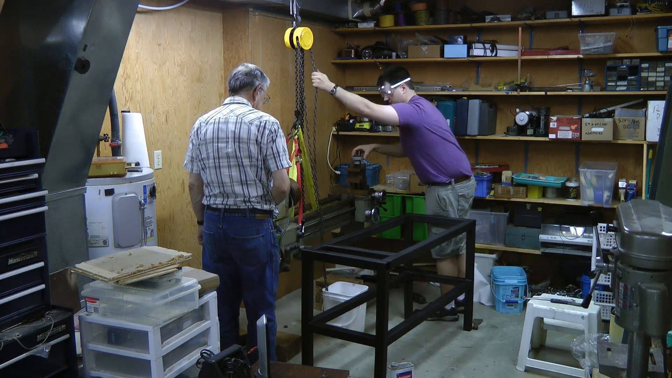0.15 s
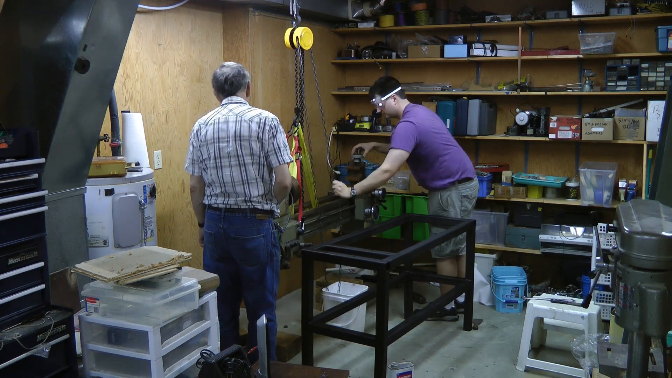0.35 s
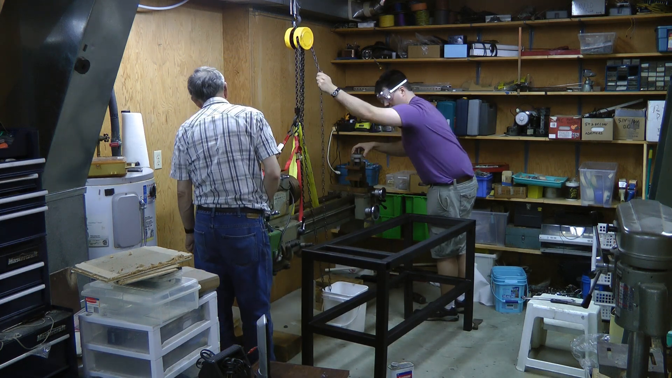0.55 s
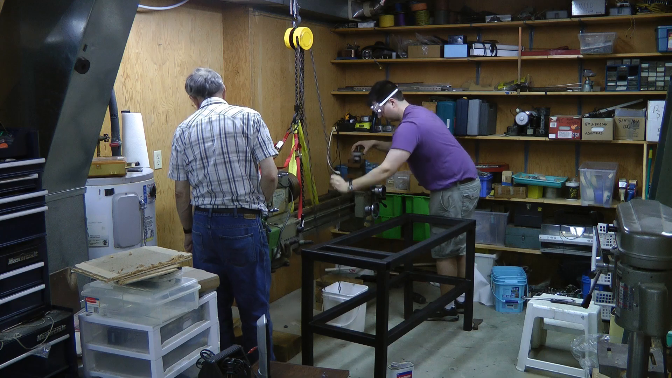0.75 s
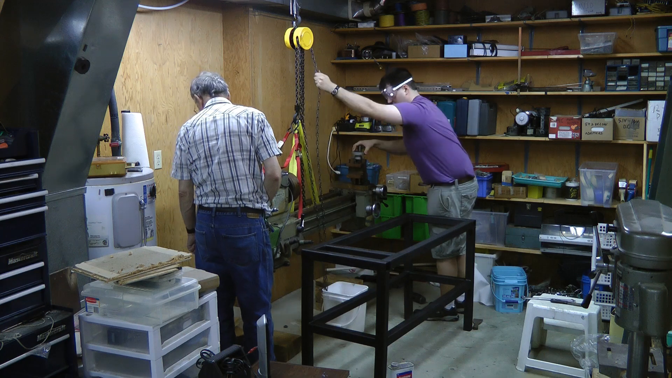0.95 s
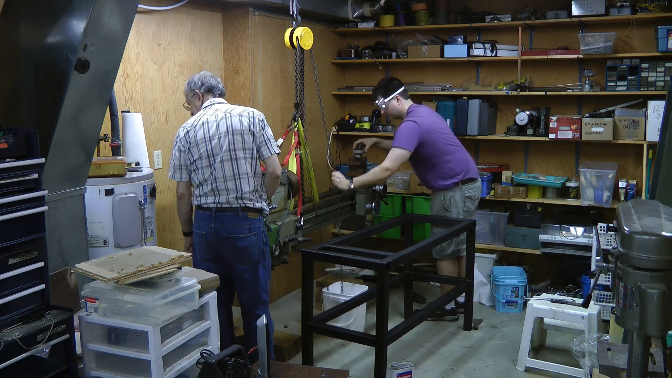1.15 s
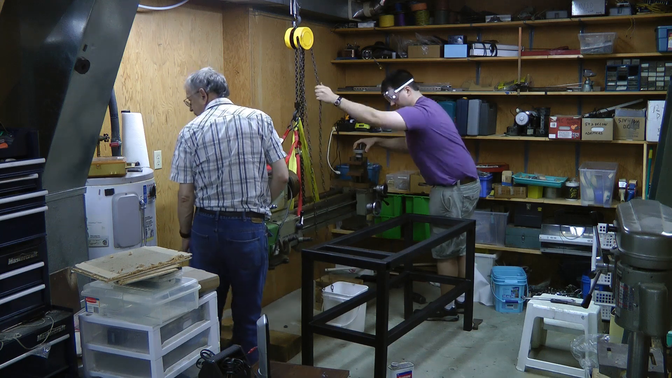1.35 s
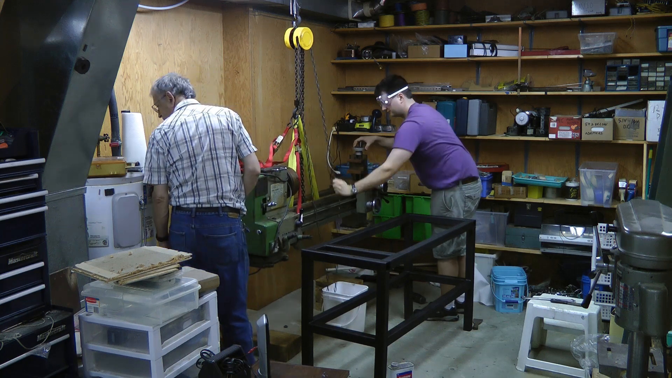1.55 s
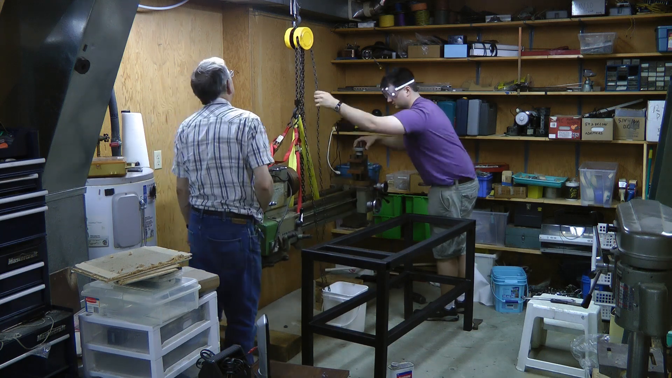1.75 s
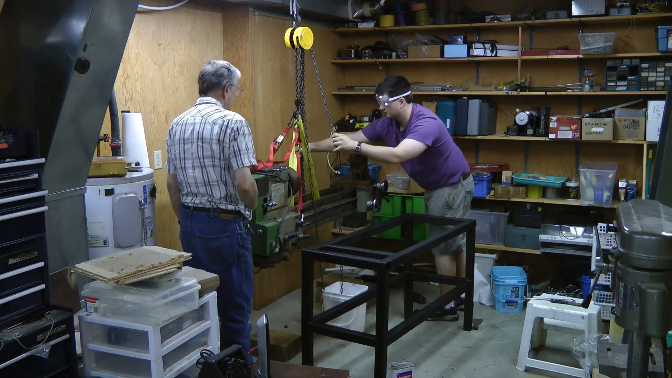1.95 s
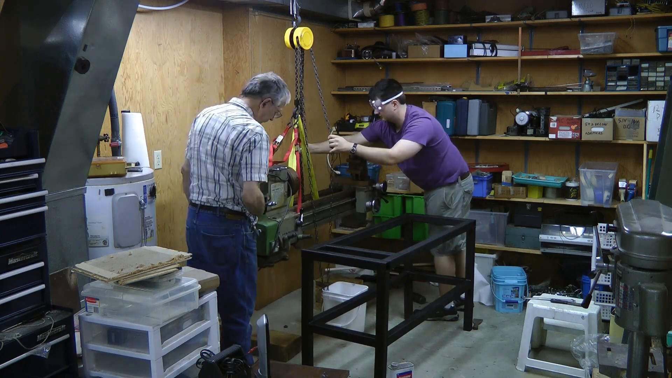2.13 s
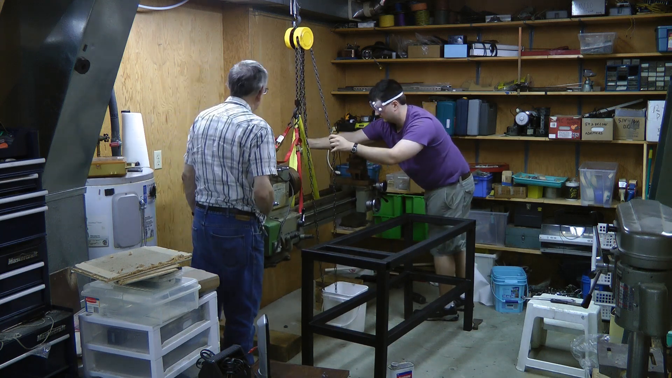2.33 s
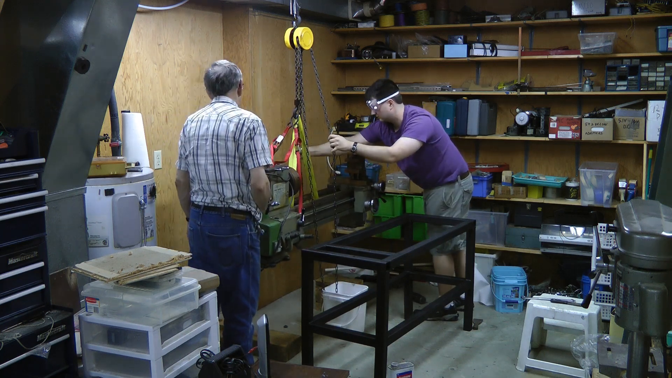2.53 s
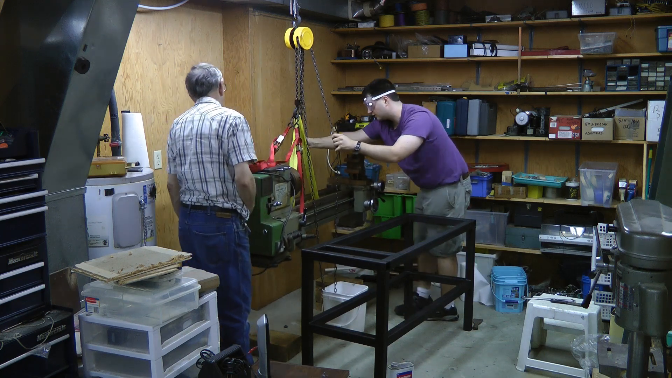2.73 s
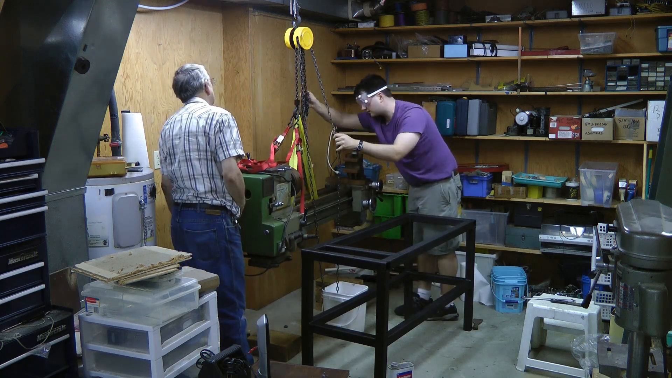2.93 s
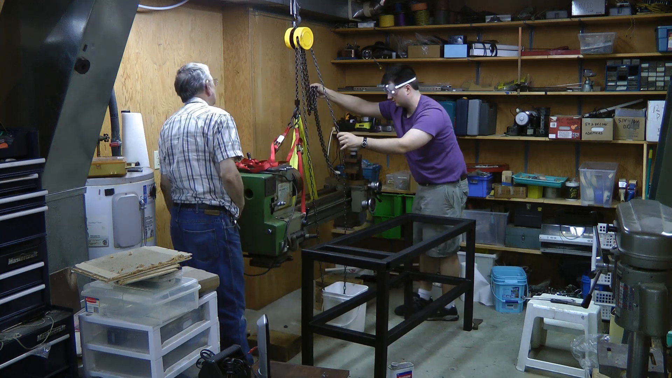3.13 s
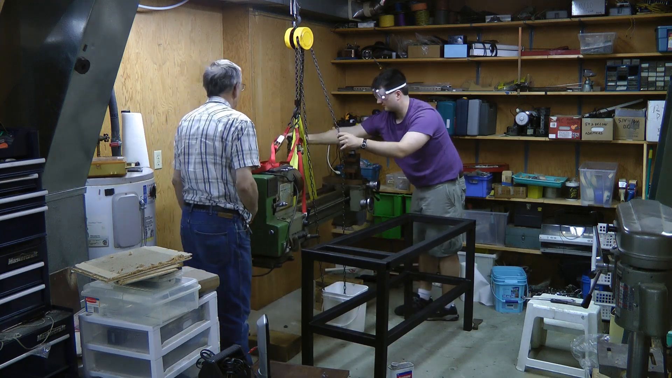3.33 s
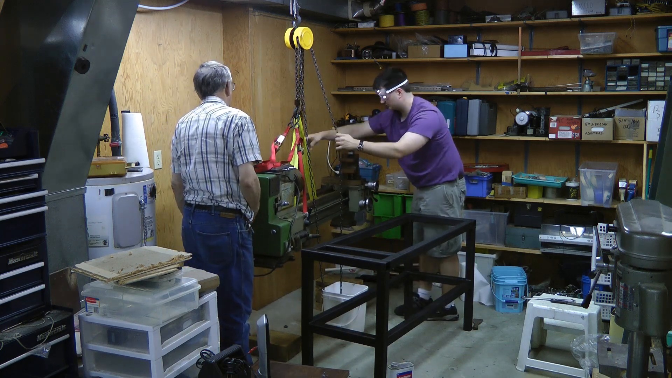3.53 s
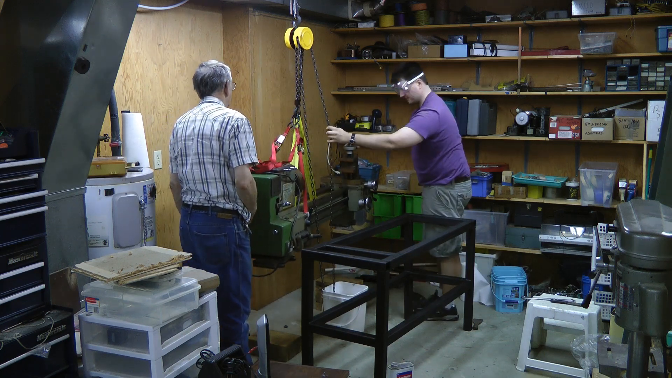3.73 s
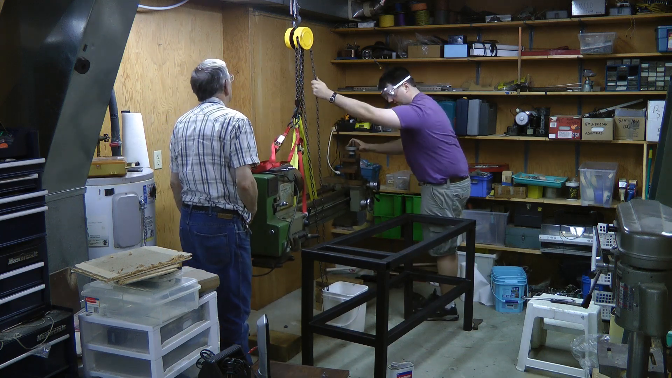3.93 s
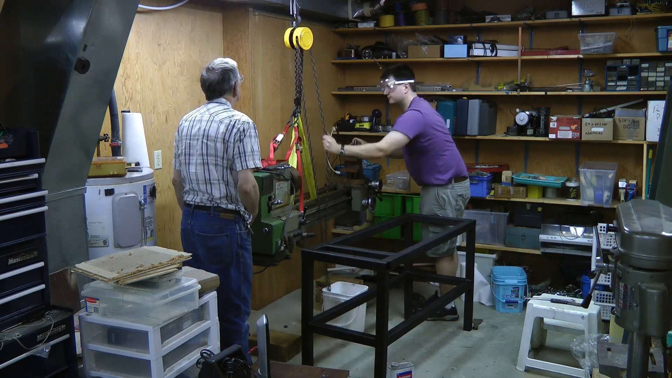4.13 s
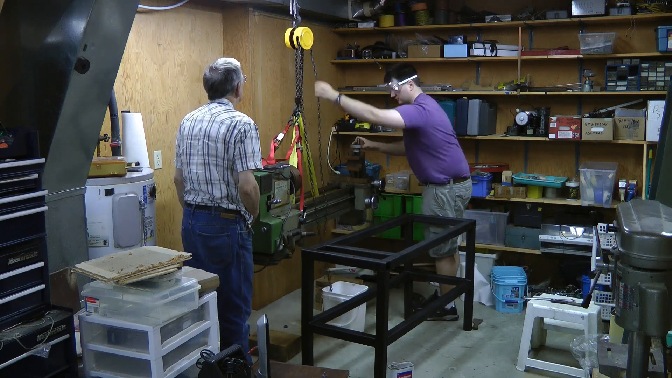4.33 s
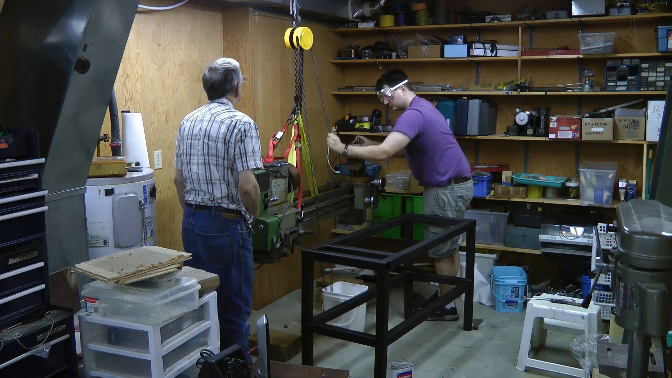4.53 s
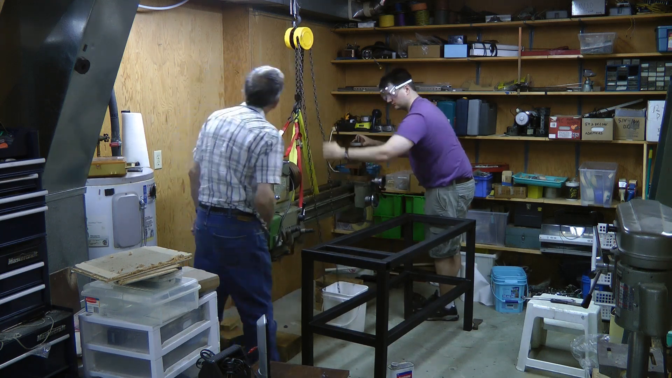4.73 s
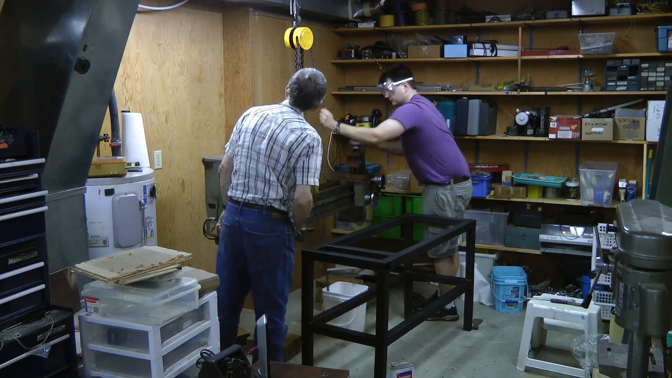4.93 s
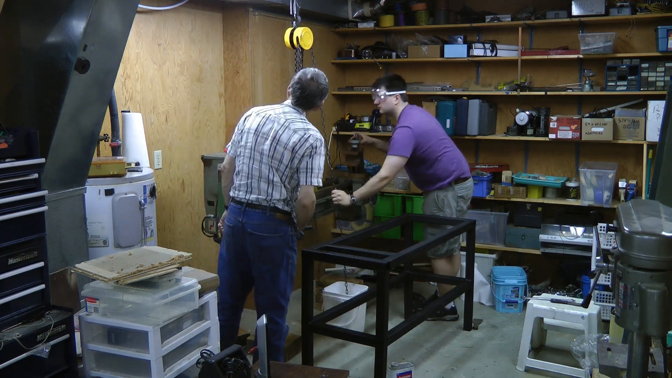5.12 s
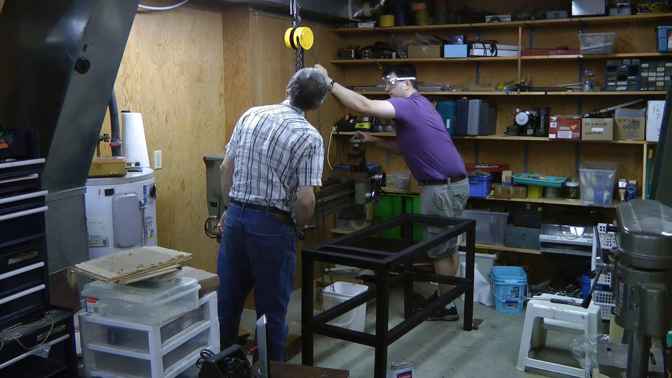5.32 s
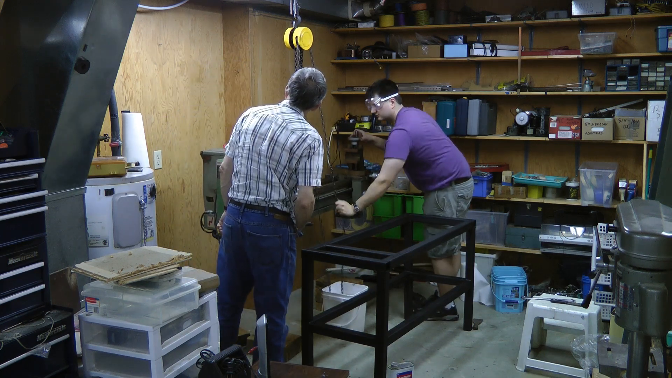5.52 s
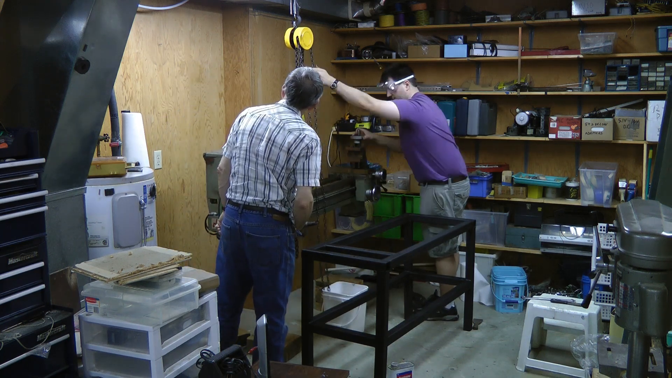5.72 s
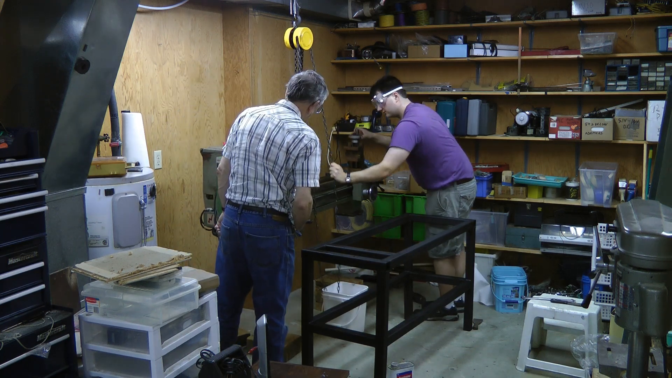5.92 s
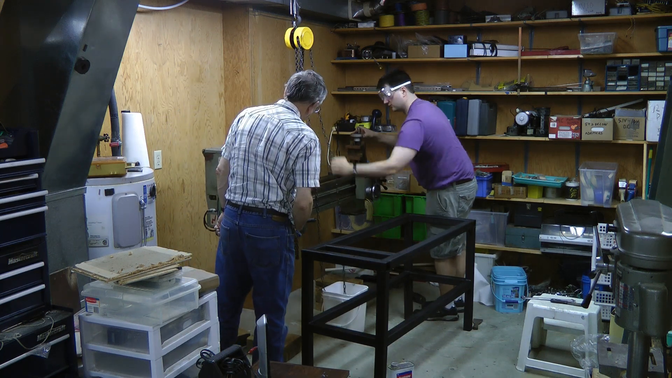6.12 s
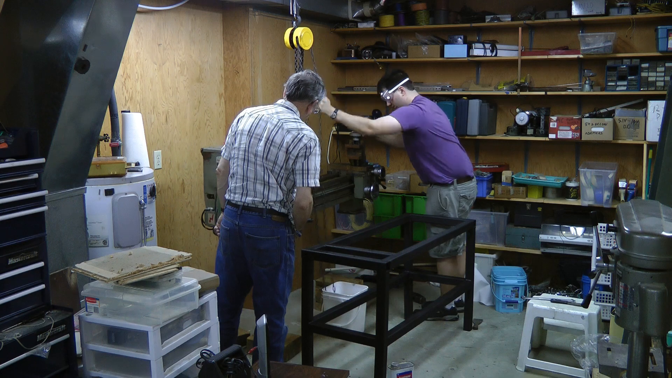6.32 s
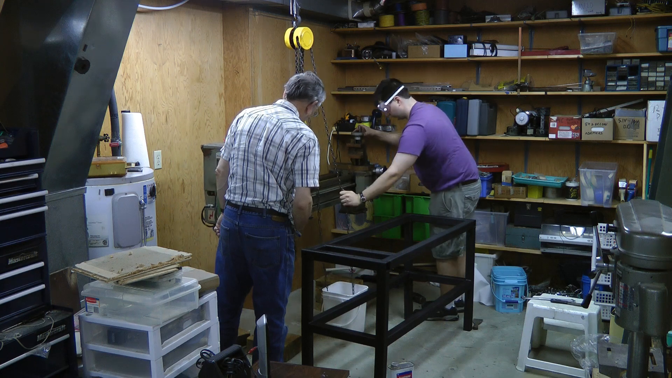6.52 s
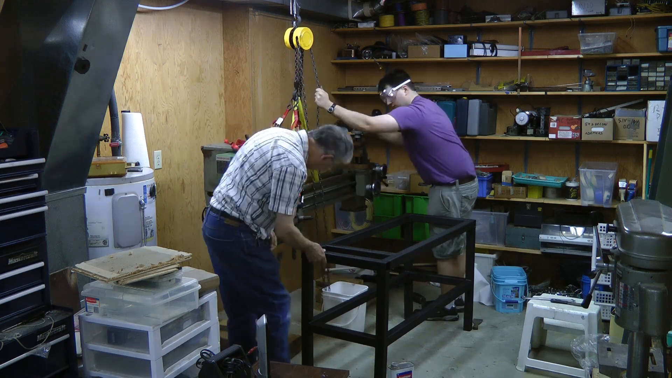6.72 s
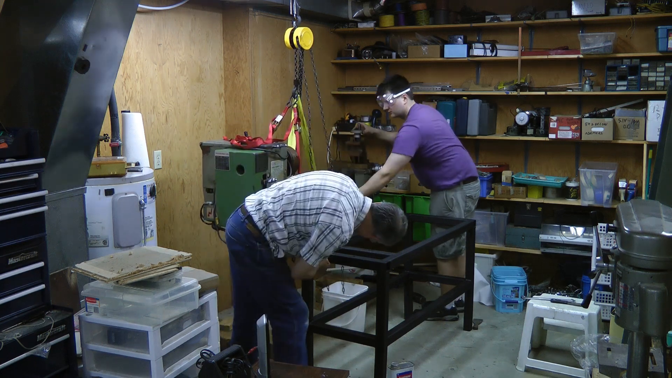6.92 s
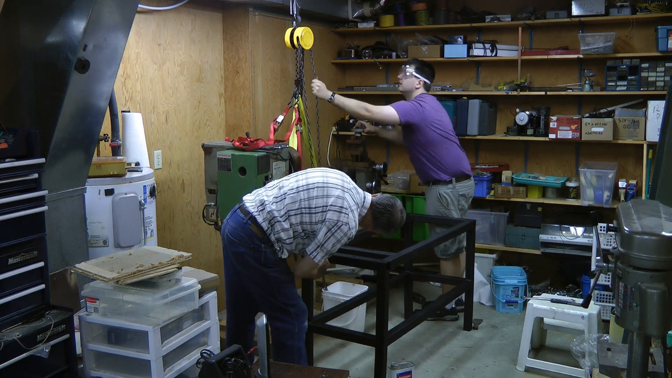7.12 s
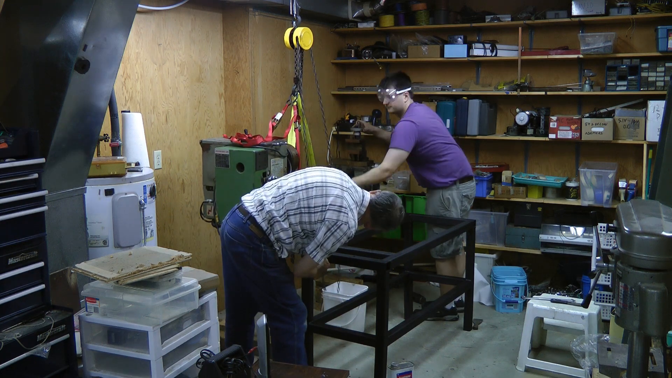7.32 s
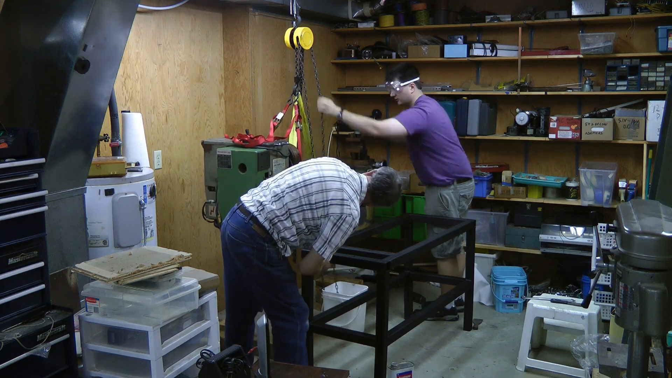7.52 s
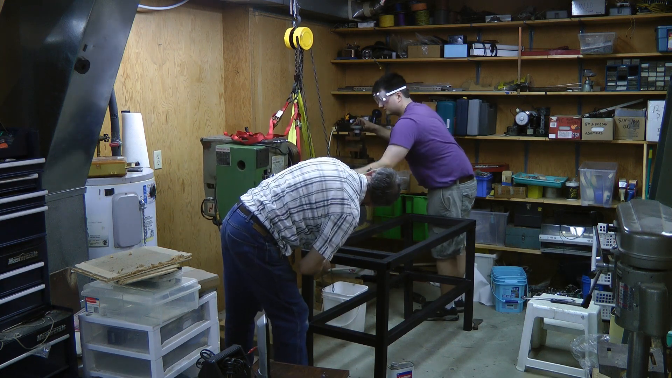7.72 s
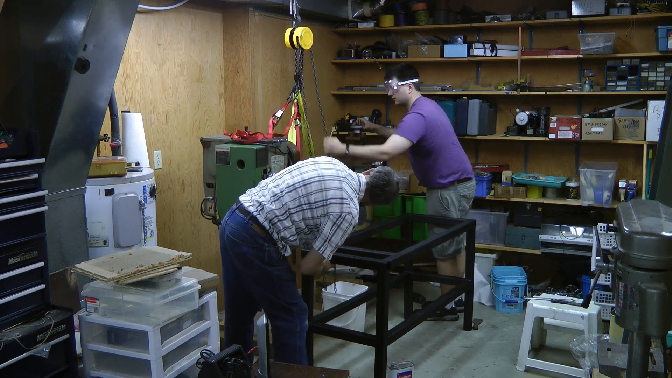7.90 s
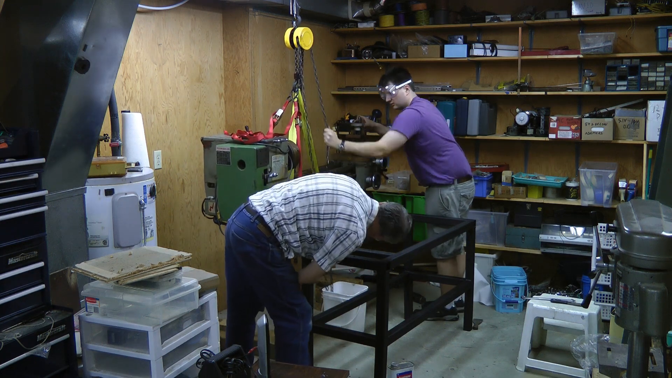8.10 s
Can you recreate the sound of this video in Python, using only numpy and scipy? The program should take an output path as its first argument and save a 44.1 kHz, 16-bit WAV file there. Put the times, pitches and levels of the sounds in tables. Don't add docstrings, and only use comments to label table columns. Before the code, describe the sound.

Rapid regular ratchety chain hauls ring a steel housing in a small workshop, pause for faint knocks on a machine, then resume steadily.

```python
import sys
import numpy as np
from scipy import signal
from scipy.fft import rfft, irfft, next_fast_len
from scipy.io import wavfile
from scipy.ndimage import uniform_filter1d

SR = 44100
rng = np.random.default_rng(int(sys.argv[2]) if len(sys.argv) > 2 else 0)


def generate_wav(sig):
    pcm = np.round(np.clip(np.atleast_2d(sig).T, -1, 1) * 32767).astype(np.int16)
    wavfile.write(sys.argv[1], SR, pcm)


def attenuation_scalar(level_db):
    decades = np.asarray(level_db, float) / 20
    return 10 ** decades


N = 359856
T = np.arange(N) / SR

PIECE = 1024
STEADY = 0.6
VARY_DB = 4.5

# (start [s], end [s], effort [dB], time to build the pull [s], sway left in the slack chain [dB])
HAULS = [(-.1, 0.01, -27, .02, -39), (0.225, 0.399, -30.5, 0.008, -59), (0.621, 0.792, -29.5, 0.004, -46.5),
         (1.023, 1.2, -30.5, 0.0089, -49), (1.43, 1.599, -28.5, 0.067, -50.5),
         (4.038, 4.054, -33.5, .003, -61), (4.068, 4.219, -29, 0.013, -39.5),
         (4.441, 4.657, -30, 0.029, -46), (4.882, 5.082, -30, 0.026, -38), (5.326, 5.528, -28, 0.075, -38),
         (5.776, 6.002, -31.5, .02, -43), (6.292, 6.479, -30.5, 0.0092, -71),
         (6.736, 6.917, -29, 0.016, -47.5), (7.168, 7.356, -29.5, .03, -48),
         (7.625, 7.746, -30.5, 0.0068, -47.5), (8.026, 8.205, -29.5, 0.017, -60)]
# (centre [s], length [s], level [dB], brightness [dB], thump in the beam [dB])
SLIPS = [(0.076, 0.034, -36.5, -3, -40.5), (0.13, 0.024, -37.5, -10, -47), (.837, 0.0094, -26, -6.5, -45),
         (1.302, 0.015, -40.5, -9.5, -42.5), (4.341, 0.028, -43, -7, -38.5), (4.69, 0.013, -38.5, 2, -35.5),
         (5.132, .012, -31, -1, -38), (5.569, 0.02, -43, -2.5, -49), (6.946, 0.015, -42.5, 4.5, -40),
         (7.098, 0.018, -38.5, -6.5, -41), (7.388, .025, -39, -7, -46)]
# (centre [s], length [s], level [dB], brightness [dB], thump in the beam [dB])
SLAPS = [(0.173, 0.035, -45, -7, -45.5), (0.491, 0.023, -41, -5.5, -42), (0.936, 0.027, -43, -8, -44.5),
         (1.225, 0.061, -43, -6, -66), (1.249, 0.013, -40.5, -2, -54), (1.373, 0.012, -41.5, -8, -49.5),
         (1.751, 0.023, -43, -5.5, -47.5), (3.807, 0.019, -51.5, -6.5, -51.5),
         (4.397, 0.014, -44.5, -5, -44), (4.777, 0.026, -45.5, -1.5, -49), (5.196, 0.012, -46, -18, -49),
         (5.673, 0.033, -50, -1, -47.5), (5.723, 0.016, -51.5, -4, -49), (6.129, 0.011, -42.5, -7.5, -49),
         (6.217, 0.026, -46.5, -11.5, -59), (6.584, .0064, -49, -13, -53), (6.663, 0.023, -41.5, -5, -46.5),
         (6.986, 0.0079, -49, -2, -36), (7.489, 0.027, -45.5, -8.5, -61),
         (7.559, 0.021, -41.5, -5.5, -40.5), (7.834, 0.02, -48.5, -17, -47),
         (7.959, .021, -46.5, -7.5, -52)]


def evened(x):
    return x / np.sqrt(np.mean(x ** 2) + 1e-20)


def levelled(x, window, amount):
    power = uniform_filter1d((x ** 2).mean(0), window)
    return x / power ** (amount / 2)


def colour(x, points):
    size = next_fast_len(N)
    hz, db = np.transpose(points)
    f = np.fft.rfftfreq(size, 1 / SR)
    gain = attenuation_scalar(np.interp(np.log(f + 1), np.log(hz + 1), db))
    return irfft(rfft(x, size) * gain, size)[..., :N]


def pieces(spread_db):
    knots = rng.standard_normal(N // PIECE + 2)
    return attenuation_scalar(spread_db * np.interp(np.arange(N) / PIECE, np.arange(len(knots)), knots))


def blows(per_s, spread_db, walls_s, direct):
    spots = 5
    size = attenuation_scalar(spread_db * np.minimum(rng.exponential(1, N), 4)) * (rng.random(N) < per_s / SR)
    size = size * rng.choice([-1., 1.], N)
    spot = rng.integers(0, spots, N)
    out = np.zeros((2, N))
    for k in range(spots):
        echoes = rng.standard_normal((2, 4096)) * attenuation_scalar(-60 * T[:4096] / walls_s)
        echoes /= np.linalg.norm(echoes, axis=1, keepdims=True)
        echoes[:, 0] += direct
        out += signal.oaconvolve((size * (spot == k))[None], echoes, axes=1)[:, :N]
    power = uniform_filter1d((out ** 2).mean(0), PIECE // 2)
    return evened(out / (power + 1e-9) ** (STEADY / 2))


def ring(x, modes, vary_db):
    out = np.zeros_like(x)
    for hz, width, db in modes:
        r = np.exp(-np.pi * width / SR)
        w = 2 * np.pi * hz / SR
        struck = x * pieces(vary_db)
        out += attenuation_scalar(db) * signal.lfilter([1 - r, 0, r - 1], [1, -2 * r * np.cos(w), r * r], struck)
    return evened(out)


def note(x, s, hz, width):
    f = hz[np.searchsorted((s[1:] + s[:-1]) / 2, T)]
    turn = np.exp(2j * np.pi * np.cumsum(f) / SR)
    r = np.exp(-np.pi * width / SR)
    return evened((turn * signal.lfilter([1 - r], [1, -r], x / turn)).real)


def split(x):
    low = signal.sosfilt(signal.butter(4, [700, 3500], "band", fs=SR, output="sos"), x)
    high = signal.sosfilt(signal.butter(4, 3500, "high", fs=SR, output="sos"), x)
    return evened(low), evened(high)


def bumps(centre, length, db):
    power = np.zeros(N)
    for c, w, d in zip(centre, length, db):
        near = slice(max(round((c - 3 * w) * SR), 0), round((c + 5 * w) * SR))
        u = (T[near] - c) / w
        fade_in = np.maximum(-u - .3, 0) ** 2 / 0.23 ** 2
        fade_out = np.maximum(u - .25, 0) / 0.51
        power[near] += attenuation_scalar(2 * d - 23.0 * np.where(u < 0, fade_in, fade_out))
    return np.sqrt(power)


def pull():
    level, shine = np.zeros(N), np.ones(N)
    for start, end, db, build_s, _ in HAULS:
        near = slice(max(round((start - .03) * SR), 0), round((end + .06) * SR))
        t = T[near] - start
        biting = np.exp(-np.maximum(t, 0) / abs(build_s))
        tired = np.clip(t / (end - start), 0, 1) ** 5.2
        edges_db = -3000 * np.maximum(-t, 0) - 1200 * np.maximum(T[near] - end, 0)
        level[near] += attenuation_scalar(db - 8 * biting - 3 * tired + edges_db)
        shine[near] = attenuation_scalar(0.83 + 1.5 * biting - tired)
    return level, shine


def sway(db_per_s):
    # (time [s], rustle [dB])
    hanging = [
        (0, -58),
        (1.3, -52),
        (1.7, -63),
        (2.3, -68),
        (2.83, -60),
        (3.08, -74.5),
        (3.5, -73),
        (4.03, -65),
        (8.1, -58.5),
    ]
    out = attenuation_scalar(np.interp(T, *np.transpose(hanging)))
    for _, end, _, _, db in HAULS:
        near = slice(round(end * SR), round((end + 1) * SR))
        out[near] += attenuation_scalar(db - db_per_s * (T[near] - end))
    return out


def strikes():
    # (centre [s], length [s], level [dB], brightness [dB])
    clinks = [(0.045, 0.022, -37, -10), (0.547, .009, -47.5, -16), (0.59, .011, -42.5, -16),
              (0.901, .019, -41, -13.5), (0.973, .023, -50, -19.5), (1.413, 0.035, -43.5, -8),
              (1.631, 0.027, -38.5, -4.5), (1.831, .006, -57, -4), (4.251, 0.019, -41.5, -9),
              (4.371, 0.023, -50, -3), (4.426, .012, -55.5, 5.5), (4.732, 0.019, -53, -22),
              (4.821, 0.019, -48, -16), (4.87, 0.016, -48, 2), (5.111, 0.05, -37, -15.5),
              (5.174, 0.0096, -44.5, -3), (5.236, 0.0104, -46, -13), (5.282, 0.011, -51, -18),
              (5.299, .009, -49, -3), (5.605, .02, -46, -12), (6.028, 0.015, -39.5, -6),
              (6.072, 0.013, -36.5, -11), (6.522, 0.014, -49, -12), (6.633, 0.037, -63, -7),
              (7.042, .009, -47.5, -9), (7.142, 0.013, -54, 2), (7.529, 0.012, -44, -5),
              (7.806, 0.011, -43, -11), (7.859, 0.015, -44, -10.5), (7.932, .012, -55.5, -4)]
    # (centre [s], length [s], level [dB], brightness [dB])
    ticks = [(2.692, 0.016, -70, 7), (3.014, 0.016, -70, 8), (3.427, .021, -57.5, 3.5),
             (3.467, 0.016, -57, 3), (3.51, 0.0099, -65.5, 6), (3.571, 0.011, -67, -4),
             (3.607, .013, -58, -3), (3.645, 0.016, -53.5, -0.5), (3.719, 0.0082, -71, 5),
             (3.83, 0.017, -64, 0), (3.907, .016, -66.5, -2), (4.003, .0072, -59, -2)]
    # (centre [s], length [s], level [dB], brightness [dB], ring of the casting [dB])
    knocks = [(1.944, 0.014, -56, -8, -59), (1.983, .021, -52.5, -8.5, -74),
              (2.013, 0.016, -57, -11.5, -70), (2.05, 0.028, -59.5, 6, -52), (2.107, 0.017, -61, -4, -79),
              (2.139, 0.012, -60, -1, -72), (2.178, 0.037, -67, 11.5, -56),
              (2.218, 0.032, -52.5, -0.5, -46), (2.296, 0.023, -59.5, 8.5, -51),
              (2.329, 0.02, -48, 0.5, -46), (2.404, 0.021, -63, 8, -53.5),
              (2.455, 0.0098, -50.5, 3.5, -48.5), (2.469, 0.065, -61.5, 3.5, -54),
              (2.52, 0.025, -54, 6.5, -44.5), (2.607, 0.04, -52.5, 3.5, -54.5),
              (2.748, 0.013, -57.5, -5, -59), (2.816, 0.021, -57.5, 5.5, -50),
              (2.852, 0.07, -58.5, 2.5, -75), (2.912, 0.12, -68, 2.5, -71)]
    rows = []
    for table in (SLIPS, SLAPS, clinks, ticks, knocks):
        resting = table is knocks
        lo, hi = (2010, 2260) if resting else (1060, 4476)
        for row in table:
            cast_db = row[4] if resting else row[2] - 14
            rows.append((*row[:4], cast_db, lo * (hi / lo) ** rng.random()))
    return np.transpose(sorted(rows))


def workshop():
    # (frequency [Hz], density [dB per Hz])
    air_colour = [(15, -62), (25, -27.5), (49, -9.5), (208, -9.5), (237, -3), (262, -11.5), (500, -9.5),
                  (682, -14.5), (1770, -21), (12000, -55), (15600, -86), (22000, -120)]
    # (frequency [Hz], level [dB rms])
    hum = [
        (1200, -85),
        (1793, -88),
    ]
    out = attenuation_scalar(-65.5) * evened(colour(rng.standard_normal((2, N)), air_colour))
    for hz, db in hum:
        phase = 2 * np.pi * rng.random((2, 1))
        out += np.sqrt(2) * attenuation_scalar(db) * np.sin(2 * np.pi * hz * T + phase)
    return out


def beam():
    # (frequency [Hz], width [Hz], level [dB])
    beam_modes = [
        (219.4, 14, 6),
        (250, 490, 0.5),
        (304, 41, -1),
        (340, 38, -10),
    ]
    jolts = blows(400, 4.5, 0.21, 0.033)
    wood = ring(ring(jolts, beam_modes, VARY_DB / 2), [(272, 254, 0)], 0)
    s, length, _, _, db = np.transpose(SLIPS + SLAPS)
    thumps = bumps(s, 1.07 * length, db)
    under_haul = attenuation_scalar(-18) * pieces(5.5) * pull()[0]
    rumble = attenuation_scalar(-4.5) * sway(110.5)
    return wood * (thumps + under_haul + rumble)


def slack_chain():
    # (frequency [Hz], width [Hz], level [dB])
    link_modes = [
        (1740, 59, 5.5),
        (2390, 160, -4.5),
        (4556, 53, -10),
    ]
    # (frequency [Hz], width [Hz], level [dB])
    machine_modes = [
        (472, 55, 0),
        (540, 60, -5),
        (605, 55, -2),
    ]
    # (frequency [Hz], density [dB per Hz])
    slack_body = [(24, -63), (40, -37), (96, -25), (204, -3), (243, -13), (283, -5), (646, -8.5), (918, -2),
                  (3300, -24), (16000, -52)]
    hail = blows(1200, 2.86, 0.16, 0.18)
    dull, bright = split(0.15 * ring(hail, link_modes, VARY_DB) + evened(colour(hail, slack_body)))
    s, length, db, bright_db, cast_db, hz = strikes()
    clink = dull + 0.8 * note(hail, s, hz, 82.0)
    out = .5 * clink * bumps(s, length, db) + bright * bumps(s, length, db + bright_db)
    cast = ring(ring(hail, machine_modes, VARY_DB / 2), machine_modes, 0)
    out += levelled(cast, PIECE, STEADY) * bumps(s, length, cast_db)
    rustle = sway(145.5) * pieces(VARY_DB / 2)
    return out + .5 * rustle * (dull + 0.75 * bright)


def pings():
    # (centre [s], length [s], level [dB], frequency [Hz])
    clear_links = [
        (.84, .009, -31, 3350),
        (3.028, .013, -58, 4030),
        (4.245, .016, -45, 4300),
        (5.13, .012, -36, 3340),
        (5.302, .01, -52, 4240),
        (6.125, .016, -62, 13300),
    ]
    out = np.zeros((2, N))
    for s, length, db, hz in clear_links:
        tone = np.sin(2 * np.pi * (hz * T + rng.random((2, 1)) / 8))
        out += np.sqrt(2) * tone * bumps([s], [length], [db])
    return out


def housing():
    # (frequency [Hz], width [Hz])
    housing_hz = [(865, 30), (903, 12), (927, 12), (948, 12), (988, 20), (1050, 30), (1265, 40), (1555, 25),
                  (1595, 18), (1722, 16), (1762, 20), (1808, 14), (2630, 45), (2690, 45), (2780, 40),
                  (3352, 22), (3940, 22), (4005, 22), (4156, 20), (4220, 22), (4325, 30), (5255, 35),
                  (5900, 35), (6450, 35), (6675, 25), (6976, 25), (7192, 25), (8910, 35)]
    housing_db = [-10, -3, 5, 3, -5, -10, -15, -7, -4, 0, -4, 2, -10, -10, -14, -10, -6, -8, -6, -7, -13,
                  -11, -9, -10, -10, -12, -10, -16]
    return [(hz, width, db) for (hz, width), db in zip(housing_hz, housing_db)]


def hauls():
    # (frequency [Hz], density [dB per Hz])
    haul_body = [(24, -62), (40, -32), (290, -14.5), (450, -20.5), (1000, -10.5), (1600, -7.5), (2100, -14),
                 (2700, -14), (4300, -13), (9200, -15.5), (13500, -28.5), (16000, -23)]
    hail = blows(1000, 3.36, 0.11, 0.44) * pieces(2.2)[::-1]
    body = evened(colour(hail, haul_body))
    dull, bright = split(ring(hail, housing(), VARY_DB) + 0.85 * body)
    bass = signal.sosfilt(signal.butter(4, 700, fs=SR, output="sos"), body)
    dull = evened(levelled(dull, 2 * PIECE, STEADY))
    s, length, db, bright_db, _ = np.transpose(SLIPS)
    clacks = 0.66 * (dull * bumps(s, length, db) + bright * bumps(s, length, db + bright_db))
    level, shine = pull()
    return clacks + level * (dull + 1.03 * bass + bright * shine)


def scene():
    return workshop() + beam() + slack_chain() + pings() + hauls()


def roll_off(x):
    return signal.sosfilt(signal.butter(12, 15870, fs=SR, output="sos"), x)


def record(dry):
    edge = signal.firwin(511, 15870, window=("kaiser", 9), fs=SR)
    mix = signal.oaconvolve(dry, edge[None], "same")
    return roll_off(mix)


dry = scene()
out = record(dry)
generate_wav(out)
```